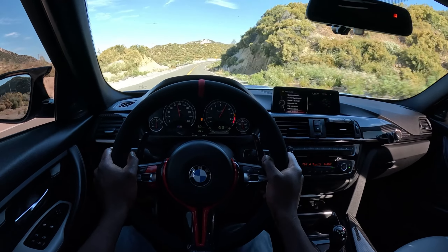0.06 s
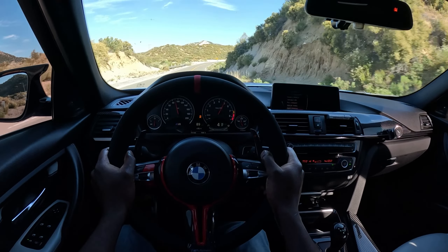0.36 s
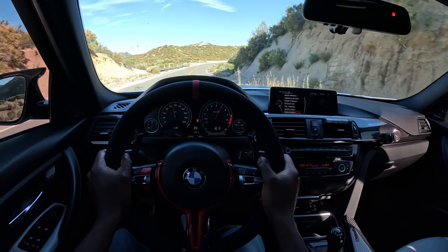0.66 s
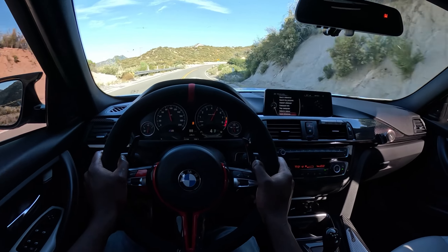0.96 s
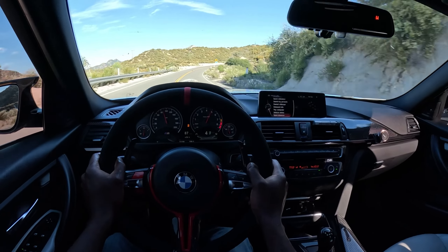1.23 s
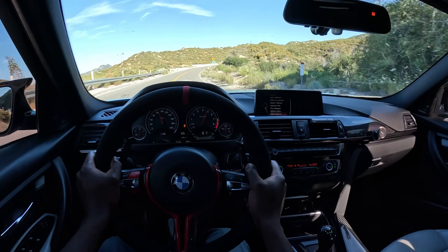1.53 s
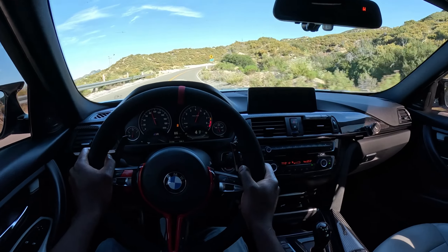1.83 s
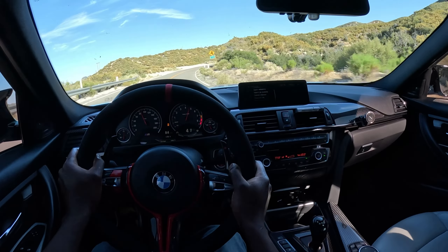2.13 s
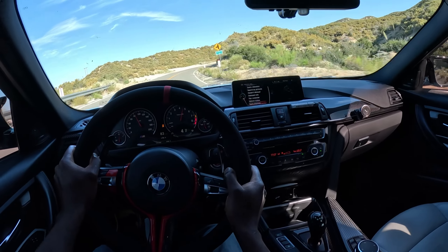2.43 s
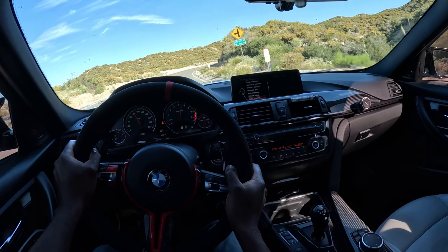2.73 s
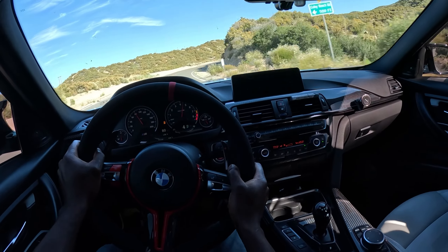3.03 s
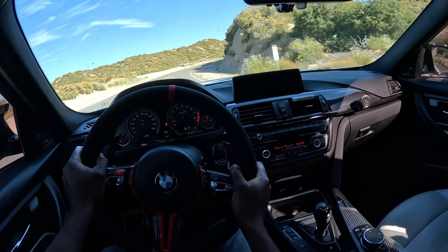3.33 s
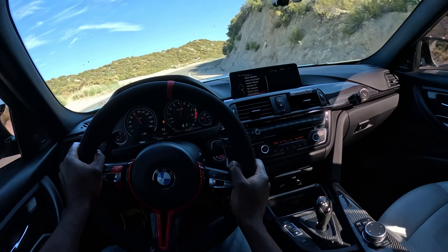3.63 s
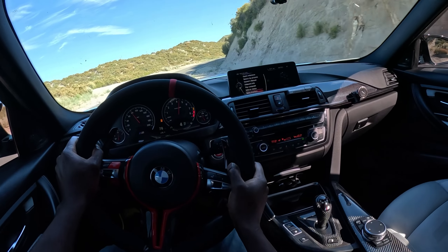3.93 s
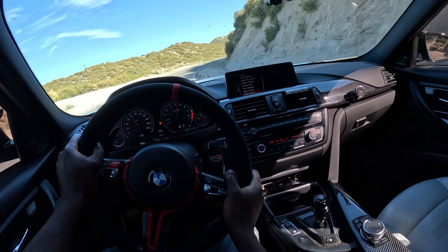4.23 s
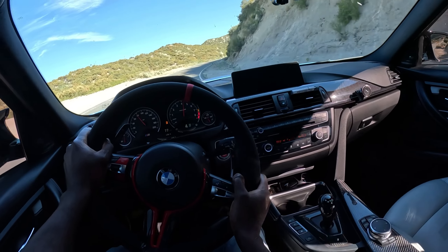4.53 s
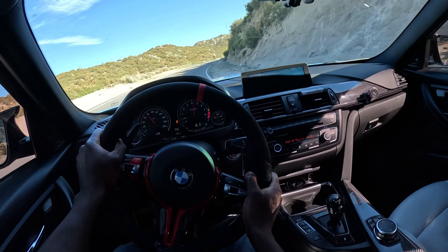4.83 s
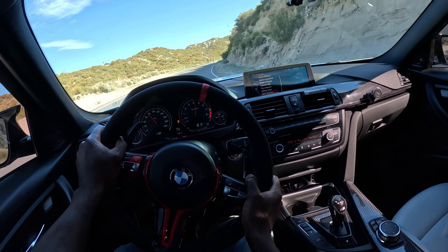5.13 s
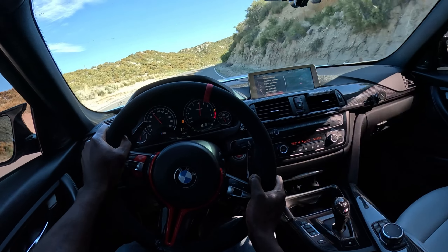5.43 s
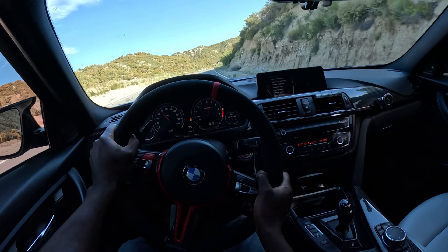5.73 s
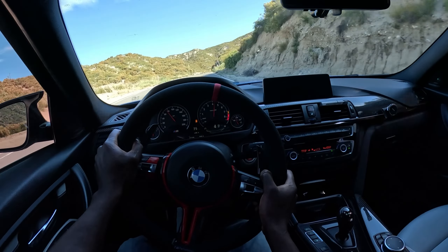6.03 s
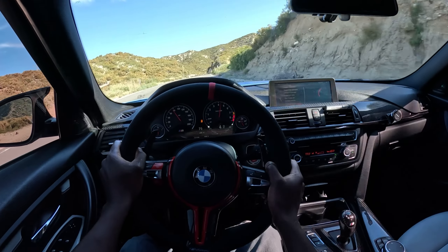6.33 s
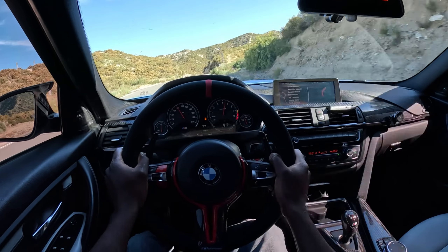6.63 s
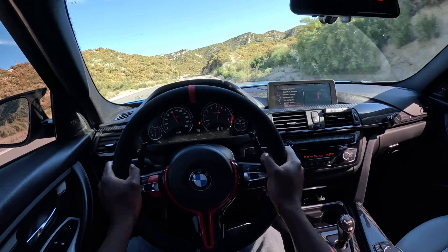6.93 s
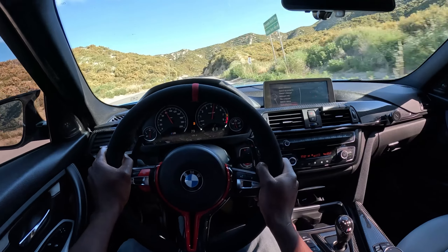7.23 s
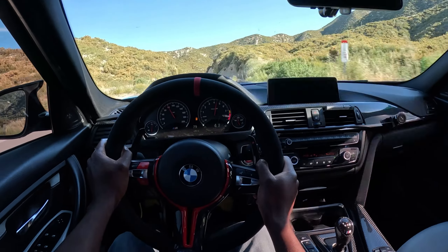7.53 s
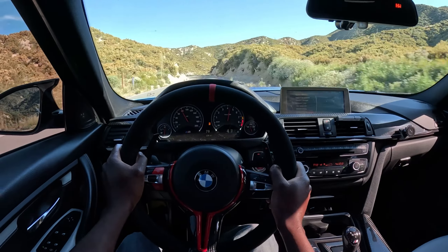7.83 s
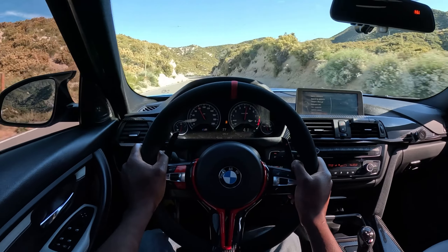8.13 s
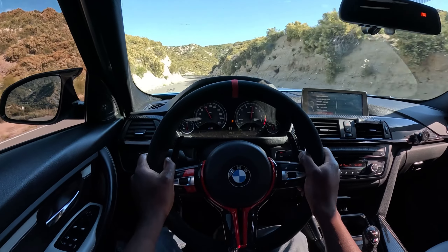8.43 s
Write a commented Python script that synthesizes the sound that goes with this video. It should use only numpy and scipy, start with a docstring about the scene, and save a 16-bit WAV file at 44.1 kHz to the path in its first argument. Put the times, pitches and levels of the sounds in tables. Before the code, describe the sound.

From the driver's seat, a sports car coasts along a mountain road with a deep throbbing cabin rumble, steady tyre roar and a low, slowly sinking engine hum with a few soft burbles. About five seconds in, the throttle opens and the exhaust swells into a raspy howl, rising slightly in pitch. It cuts off with a quick rattle of pops and a faint whoosh of turbo air, and the car coasts again.

```python
"""First you hear air throbbing in the cabin and tyres roaring, as a turbocharged six-cylinder sports car
coasts along a mountain road. From 5 s the throttle opens: the engine's firings make the exhaust howl,
and puffs of hot gas make it rasp. At 6.7 s the throttle shuts, unburnt fuel pops in the pipe on every
third turn of the crankshaft, and the turbo dumps its air in a whoosh. Before the howl, while the engine
coasts, the exhaust burbles softly."""
import sys
import numpy as np
from scipy import signal
from scipy.fft import rfft, irfft
from scipy.io import wavfile
from scipy.ndimage import uniform_filter1d

SR = 44100
rng = np.random.default_rng(int(sys.argv[2]) if len(sys.argv) > 2 else 0)


def to_wav(sig):
    """Store sig (one row per channel, or 1-D mono) as 16-bit WAV at the path in sys.argv[1].

    Samples outside -1..1 are clipped; the rate is SR.
    """
    pcm = np.clip(np.atleast_2d(sig), -1, 1) * 32767
    pcm = np.round(pcm).astype(np.int16)
    wavfile.write(sys.argv[1], SR, pcm.T)  # frames by channels


N = 377496
TIME = np.arange(N) / SR
THROTTLE_SHUT_S = 6.704


# how fast the crankshaft spins: time_s, turns_per_s
CRANK_SPEED = [(0, 125.8), (1.25, 121.3), (1.8, 120), (2.3, 116.6), (2.72, 113), (3.4, 110.8),
               (4.05, 109.6), (4.35, 108.7), (4.7, 106.8), (5.1, 105.5), (5.35, 105.1), (5.6, 106.7),
               (5.78, 107.1), (5.92, 108.1), (6.15, 110.2), (6.33, 112), (6.48, 112.8), (6.62, 114.6),
               (6.82, 112.3), (7.0, 111.2), (7.7, 109.8), (8.1, 107.4), (8.56, 106.5)]
# how hard the engine works, 0 being full load: time_s, effort_db
ENGINE_EFFORT = [(0, -13.5), (1.0, -14.5), (1.5, -13.5), (2.4, -15), (2.85, -12.5), (3.3, -13), (3.75, -17),
                 (4.0, -13.5), (4.18, -10.3), (4.36, -10.3), (4.55, -16), (4.95, -15), (5.2, -8),
                 (5.67, -4.2), (5.9, -3.8), (6.05, -2.2), (6.2, -1.3), (6.3, -.4), (6.53, -0.7), (6.66, .7),
                 (6.76, -1.2), (6.9, -3), (7.0, -7.3), (7.1, -12.5), (7.7, -14.5), (8.56, -14)]
def engine():
    """The engine coasts, pulls once and coasts again; gives its turns so far, speed and effort."""
    crank_hz, = curves(CRANK_SPEED)
    effort_db, = curves(ENGINE_EFFORT)
    return np.cumsum(crank_hz) / SR, crank_hz, effort_db


# the exhaust's tones; overrun is the moment after the throttle shuts:
# cycles_per_turn, full_load_db, db_per_effort_db, overrun_change_db
ENGINE_TONES = [(2, -21, 1.35, -4), (3, -18.5, 1.9, .5), (4, -31.3, 2, 6.5), (5, -37.5, 1.8, 10),
                (6, -38.3, 3.3, -2), (7, -41.5, 4, 2.5), (8, -46.5, 3, -5), (12, -55, 3.5, 3)]
# standing waves in the cabin lift or swallow a tone that glides past: pitch_hz, width_hz, change_db
CABIN_WAVES = [(214.5, 3.5, -3.5), (247, 7, 4), (320.8, 2.5, 2), (324.3, 1.2, -12), (331, 1.8, -4),
               (343, 3, 2), (361, 6, 4), (439, 11, 6.5), (459, 4, -5), (548, 8, 9.5), (654, 7, 5),
               (665, 4, -9), (765, 14, -6), (784, 8, 6)]
def exhaust_tones(turns, crank_hz, effort_db, jitter_turns=0.008, coast_waver_db=2.5):
    """Three firings a turn make the howl; two unequal sets of cylinders add the tones around it."""
    angle = 2 * np.pi * (turns + jitter_turns * wander(30))
    roughness_db = 0.4 * wander(90)  # uneven burning shakes the high tones most
    cut_db = -5.5 * ignition_cut()
    overrun = swell(THROTTLE_SHUT_S, hold_s=0.18, rise_db_per_s=900, fall_db_per_s=114.5)
    coasting = np.clip(1 - undb(effort_db), 0, 1) ** 2
    howl = np.zeros(N)
    for multiple, full_db, growth, overrun_db in ENGINE_TONES:
        tone_hz = multiple * crank_hz
        cabin_db = sum(db * np.exp(-((tone_hz - hz) / width) ** 2) for hz, width, db in CABIN_WAVES)
        waver_db = (1.6 if multiple > 4 else 0.6) * wander(24)
        waver_db += coast_waver_db * coasting * wander(5.1)
        waver_db += (multiple - 1) * roughness_db
        level_db = full_db + growth * effort_db + cabin_db + cut_db + overrun_db * overrun + waver_db
        howl += undb(level_db) * np.sin(multiple * angle + 2 * np.pi * rng.random())
    return np.sqrt(2) * howl


def ignition_cut():
    """The sparks stop briefly as the throttle shuts: 1 during the cut, fading fast to 0 either side."""
    return swell(THROTTLE_SHUT_S, hold_s=0.065, rise_db_per_s=900, fall_db_per_s=900)


def exhaust_rasp(turns, effort_db, full_load_db=-31.7, puff_depth=0.32, jitter_turns=0.032):
    """Each firing sends a rough puff down the pipe; unburnt gas flares just after the throttle shuts."""
    flow = undb(full_load_db + 2.2 * effort_db)
    flare = undb(-25.8) * swell(6.8, hold_s=0, rise_db_per_s=68, fall_db_per_s=114.5)
    firing = np.cos(2 * np.pi * 3 * (turns + jitter_turns * wander(110)))
    puffs = np.exp(puff_depth * firing) * rng.standard_normal(N)
    return np.hypot(flow, flare) * unit(pipe(puffs, muffle_hz=1820))


# the notes at which the pipe and cabin ring: pitch_hz, width_hz, gain_db
PIPE_NOTES = [(272, 22, 1.5), (328, 26, 2.5), (483, 67, 19), (570, 50, -0.5), (665, 80, -8),
              (810, 100, -17), (980, 93, -13.5), (1160, 210, -10.5), (1300, 140, -10.5), (1580, 250, -21.5)]
def pipe(gas, muffle_hz):
    """Gas makes the exhaust pipe ring, and the car's body shuts out the treble."""
    ringing = sum(undb(db) * ring(gas, hz, width) for hz, width, db in PIPE_NOTES)
    return signal.sosfilt(signal.butter(4, muffle_hz, fs=SR, output="sos"), ringing)


# unburnt fuel exploding in the pipe: start_s, bark_peak_db
EXPLOSIONS = [(6.708, -11), (6.7342, -11.5), (6.7605, -10.5), (6.787, -20)]
def exhaust_pops(push_s=0.0014, knock_hz=260, thump_hz=38):
    """Each explosion is a soft push that barks in the pipe, knocks the floor and thumps the cabin air."""
    t = TIME[:SR // 4]
    push = t * np.exp(-2 * t / push_s)
    bark = pipe(push, muffle_hz=760)
    knock = ring(ring(push, knock_hz, width_hz=130), knock_hz, width_hz=260)
    thump = ring(ring(push, thump_hz, width_hz=40), thump_hz, width_hz=80)
    pop = sum(undb(db) * part / np.abs(part).max() for part, db in [(bark, 0), (knock, -4), (thump, 1)])
    pops = np.zeros(N)
    for start_s, db in EXPLOSIONS:
        start = int(start_s * SR)
        pops[start:start + len(t)] += undb(db) * pop
    return pops


# soft late burns in the pipe: middle_s, length_s, level_db
AFTERBURNS = [(2.81, 0.078, -40), (4.322, 0.063, -42), (4.46, 0.08, -37.5), (4.915, 0.05, -32)]
def exhaust_burbles(turns, flutter_depth=0.33):
    """Off throttle, soft burns flutter in the pipe once every two turns of the crankshaft."""
    burns = sum(undb(db) * np.exp(-2 * ((TIME - s) / length) ** 2) for s, length, db in AFTERBURNS)
    flutter = (1 + flutter_depth * np.cos(np.pi * turns)) * rng.standard_normal(N)
    return burns * unit(pipe(flutter, muffle_hz=550))


# the tone of air drawn through the throttle: pitch_hz, relative_db
INTAKE_COLOUR = [(850, -6.5), (1200, 1), (1500, -5), (1900, -11.5), (2400, -20.5)]
def intake(turns, level_db=-48, gulp_depth=0.44):
    """The cylinders gulp air through the opening throttle; the exhaust soon covers the sound."""
    flow = undb(level_db) * swell(5.75, hold_s=0.56, rise_db_per_s=18, fall_db_per_s=18)
    gulps = np.cos(2 * np.pi * 3 * turns)
    return flow * (1 + gulp_depth * gulps) * noise(INTAKE_COLOUR)


# the tone of the turbo's hiss: pitch_hz, relative_db
TURBO_COLOUR = [(1500, -1), (2200, -6.5), (3200, 3), (4300, -2), (5100, 1.5), (6000, -5.5), (8000, -13.5),
                (10000, -31.5), (12000, -46.5)]
def turbo_hiss(level_db=-57):
    """The turbo hisses as it builds up air pressure."""
    pressure = swell(6.41, hold_s=0.5, rise_db_per_s=24.5, fall_db_per_s=103)
    return undb(level_db) * pressure * noise(TURBO_COLOUR)


# puffs of air let out by the turbo's valve: peak_s, level_db
VALVE_PUFFS = [(6.69, -53.5), (6.81, -50)]
# the tone of those puffs: pitch_hz, relative_db
PUFF_COLOUR = [(1500, -9.5), (2400, -4.5), (3000, 3.5), (3700, 2.5), (5200, -7.5), (6500, -9),
               (8000, -10.5), (9500, -17), (10300, -23.5), (11200, -37), (15000, -35)]
VALVE_RISE_DB_PER_S, VALVE_FALL_DB_PER_S = 161, 131
def turbo_dump(hold_s=0.033, flutter_db=1.0):
    """A valve lets the turbo's pressure go in two fluttering whooshes."""
    puffs = sum(undb(db) * swell(s, hold_s, VALVE_RISE_DB_PER_S, VALVE_FALL_DB_PER_S)
                for s, db in VALVE_PUFFS)
    return puffs * undb(flutter_db * wander(90)) * noise(PUFF_COLOUR)


# the tone of the last air leaving the valve: pitch_hz, relative_db
LEAK_COLOUR = [(7500, -4.5), (9000, -2.5), (10100, 1.5), (10800, -15.5), (12000, -26)]
def valve_whistle(peak_s=6.855, end_hz=9570, drop_hz=420, settle_s=0.03, waver_hz=130):
    """A thin whistle sinks as the pressure behind the valve falls, and the last air leaks away."""
    sinking = np.exp(-np.maximum(TIME - peak_s, 0) / settle_s)
    pitch_hz = end_hz + drop_hz * sinking + waver_hz * wander(900)
    tone = np.sqrt(2) * np.sin(2 * np.pi * np.cumsum(pitch_hz) / SR)
    singing = swell(peak_s, hold_s=0.08, rise_db_per_s=401, fall_db_per_s=VALVE_FALL_DB_PER_S)
    leaking = swell(peak_s, hold_s=0, rise_db_per_s=VALVE_RISE_DB_PER_S, fall_db_per_s=46.5)
    return undb(-75.5) * singing * tone + undb(-72.5) * leaking * noise(LEAK_COLOUR)


def gear_whine(turns, effort_db, cycles_per_turn=2.31, full_load_db=-34, waver_db=3.5):
    """Parts geared to the crankshaft give a weak, wavering whine that grows as the engine works."""
    level_db = full_load_db + 1.3 * effort_db + waver_db * wander(11)
    return np.sqrt(2) * undb(level_db) * np.sin(2 * np.pi * cycles_per_turn * turns)


# the cabin's rumble, and how much of it is floor boom: time_s, level_db, boom_vs_throb_db
RUMBLE_LEVELS = [(0, -12.5, -9), (.6, -14.5, -8), (1.3, -14, -8), (2.0, -14, -11.5), (2.7, -13.5, -7.5),
                 (3.2, -14.5, -8.5), (3.55, -15, -2.5), (3.85, -14, -12), (4.3, -14.5, -6.5),
                 (5.4, -15, -8), (6.0, -13.5, -9), (6.7, -15.5, -8), (7.5, -14.5, -8.5), (8.56, -14, -10)]
# the tone of the throbbing air: pitch_hz, relative_db
THROB_COLOUR = [(8, -32), (15, -19), (21, 4.5), (27, -3), (36, -6), (43, -10), (50, -10.5), (62, -19.5),
                (85, -32)]
# the tone of the booming floor: pitch_hz, relative_db
BOOM_COLOUR = [(45, -19), (65, -2), (95, -1.5), (115, -1), (150, -1), (175, -4), (205, -14), (260, -16),
               (340, -18.5)]
def cabin_rumble(gust_db=0.5, bump_db=1.38, waver_db=0.5, dip_db=-5):
    """Air throbs and bumps boom through the floor, their sum held to an even level so one gives way to the
    other; the rumble dips briefly under the pops."""
    level_db, boom_db = curves(RUMBLE_LEVELS)
    throb = undb(gust_db * wander(14)) * steady(noise(THROB_COLOUR), span_s=0.13)
    boom = undb(boom_db + bump_db * wander(12)) * steady(noise(BOOM_COLOUR), span_s=0.14)
    level_db += waver_db * wander(11) + dip_db * ignition_cut()
    return undb(level_db) * steady(throb + boom, span_s=0.04)


# how strong each road sound is along the way: time_s, roar_db, tread_gain_db, drone_db, wind_db
ROAD_LEVELS = [(0, -31.5, -40, -31.5, -64), (.65, -36, -44, -36, -67.5), (.9, -36, -43.5, -33, -66),
               (1.5, -34, -42, -36, -65), (2.0, -38, -45, -35.5, -67.5), (2.3, -36.5, -42.5, -34, -67.5),
               (2.65, -35, -42.5, -29.5, -66), (3.2, -42, -43.5, -34, -67.5),
               (4.15, -38.5, -44, -39, -67.5), (4.4, -36, -42.5, -36.5, -66.5), (5.2, -40.5, -44, -39, -67),
               (6.4, -33.5, -41.5, -39, -66.5), (7.25, -37.5, -44.5, -35.5, -70.5),
               (7.8, -37, -42.5, -38.5, -66.3), (8.56, -36, -45, -34.5, -68.5)]
# the tone of the low roar that comes through the suspension: pitch_hz, relative_db
ROAR_COLOUR = [(150, -8.5), (250, 1), (330, -2), (400, -2), (460, -9.5), (560, -8), (700, -9),
               (1000, -26.5)]
# the tone of the wind: pitch_hz, relative_db
WIND_COLOUR = [(2000, -19.5), (4000, -3), (5000, 0), (6500, -1.5), (8000, -5.5), (9500, -11.5),
               (11000, -21.5), (15000, -33)]
def road_and_wind(patchy_db=0.6, tyre_air_hz=221.1):
    """Tyres roar on patchy asphalt, the air inside them drones, and wind hisses along the glass."""
    roar_db, tread_db, drone_db, wind_db = curves(ROAD_LEVELS)
    patches = undb(patchy_db * wander(20))
    roar = undb(roar_db) * noise(ROAR_COLOUR)
    rush = undb(tread_db) * tread_rush()
    drone = undb(drone_db) * steady(narrow_noise(tyre_air_hz, width_hz=14), span_s=0.61)
    wind = undb(wind_db + 0.6 * wander(30)) * noise(WIND_COLOUR)
    return patches * (roar + rush + rock_echo()) + drone + wind


# the tone of the tread on the road: pitch_hz, relative_db
TREAD_COLOUR = [(400, -24.5), (620, -2), (720, -6.5), (780, -1.5), (900, -1), (1080, -2), (1230, -2.5),
                (1450, -9), (2200, -19), (3200, -19), (4200, -29.5), (6000, -48.5)]
# the notes at which the body panels ring: pitch_hz, width_hz, relative_db
PANEL_NOTES = [(508.8, 23, -6), (624, 84, -7.5), (858, 62, -9.5), (978, 97, -10.5), (1153.5, 54, -12),
               (1278, 94, -16)]
def tread_rush():
    """The tyre tread rushes over the road and sets the car's panels ringing."""
    panels = sum(undb(db) * narrow_noise(hz, width) for hz, width, db in PANEL_NOTES)
    return undb(0.5) * noise(TREAD_COLOUR) + panels


# the tone of the hiss coming back from the rock: pitch_hz, relative_db
ECHO_COLOUR = [(1350, -3.5), (1650, 2.5), (2200, -6.5), (3300, -5.5), (4200, -22)]
def rock_echo(level_db=-56, passed_s=1.95):
    """A rock face beside the road throws tyre hiss back until the car has passed it."""
    alongside = swell(0, hold_s=passed_s, rise_db_per_s=31.5, fall_db_per_s=31.5)
    return undb(level_db) * alongside * noise(ECHO_COLOUR)


def undb(db):
    """Turn decibels into a number to multiply by."""
    return 10 ** (np.asarray(db) / 20)


def unit(x):
    """Scale a signal to an average (rms) level of 1."""
    return x / np.sqrt(np.mean(x ** 2))


def curves(table):
    """Join a table's rows with straight lines in time, giving one curve for each value column."""
    time_s, *columns = np.transpose(table)
    return [np.interp(TIME, time_s, column) for column in columns]


def noise(colour):
    """Noise at level 1, shaped by a pitch_hz, relative_db table and fading beyond its ends."""
    hz, db = np.transpose(colour)
    all_hz = np.maximum(np.arange(N // 2 + 1) * SR / N, 1)
    ends = np.minimum(all_hz / hz[0], 1) * np.minimum(hz[-1] / all_hz, 1)
    gain = undb(np.interp(np.log(all_hz), np.log(hz), db)) * ends ** 4
    return unit(irfft(rfft(rng.standard_normal(N)) * gain, N))


def wander(steps_per_s):
    """A smooth random drift, typically about 1 in size."""
    step = max(int(SR / steps_per_s), 2)
    held = np.repeat(rng.standard_normal(N // step + 1), step)
    return unit(uniform_filter1d(uniform_filter1d(held, step), step)[:N])


def ring(x, pitch_hz, width_hz):
    """Ring at one pitch: sound there passes fully, and the rest is weakened."""
    return signal.lfilter(*signal.iirpeak(pitch_hz, pitch_hz / width_hz, fs=SR), x)


def narrow_noise(pitch_hz, width_hz):
    """Noise at level 1, gathered around one pitch."""
    return unit(ring(ring(rng.standard_normal(N), pitch_hz, width_hz), pitch_hz, width_hz))


def steady(x, span_s):
    """Even out level changes slower than span_s."""
    span = int(span_s * SR)
    return x / np.sqrt(uniform_filter1d(uniform_filter1d(x ** 2, span), span) + 1e-9)


def swell(peak_s, hold_s, rise_db_per_s, fall_db_per_s):
    """A gain that rises to 1 at peak_s, holds, and dies away."""
    early_s = np.maximum(peak_s - TIME, 0)
    late_s = np.maximum(TIME - peak_s - hold_s, 0)
    return undb(-np.minimum(rise_db_per_s * early_s + fall_db_per_s * late_s, 200))


def scene():
    """Everything as heard from the driver's seat, in one channel."""
    turns, crank_hz, effort_db = engine()
    exhaust = exhaust_tones(turns, crank_hz, effort_db) + exhaust_rasp(turns, effort_db)
    exhaust += exhaust_pops() + exhaust_burbles(turns)
    engine_air = intake(turns) + turbo_hiss() + turbo_dump() + valve_whistle()
    background = gear_whine(turns, effort_db) + cabin_rumble() + road_and_wind()
    return (exhaust + engine_air + background)[None]


def record(dry):
    """The very top of the treble is cut away."""
    top_hz = 15700
    return signal.sosfilt(signal.ellip(8, 0.2, 70, top_hz, fs=SR, output="sos"), dry)


dry = scene()
out = record(dry)
to_wav(out)
```